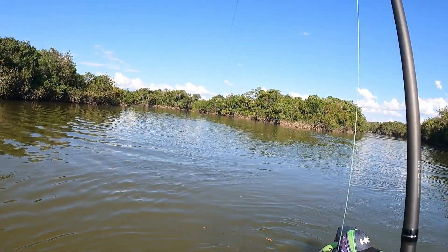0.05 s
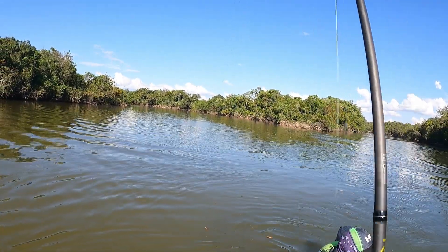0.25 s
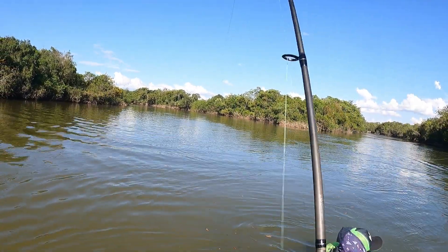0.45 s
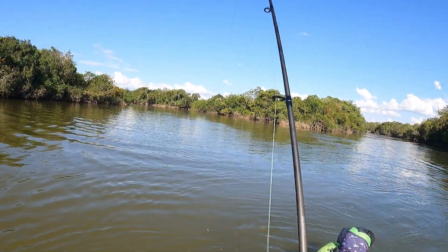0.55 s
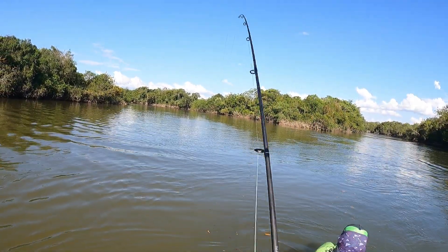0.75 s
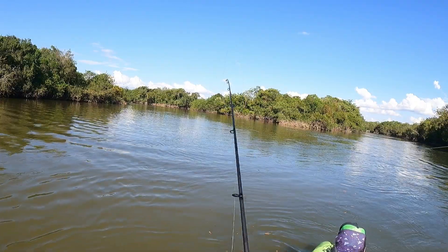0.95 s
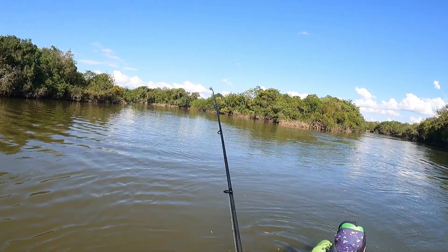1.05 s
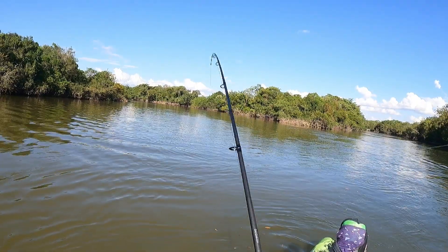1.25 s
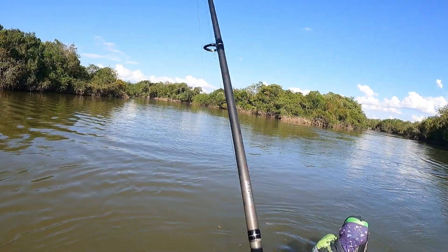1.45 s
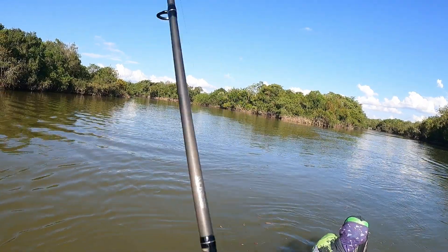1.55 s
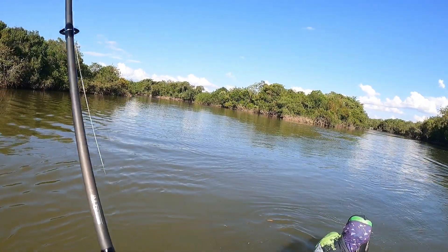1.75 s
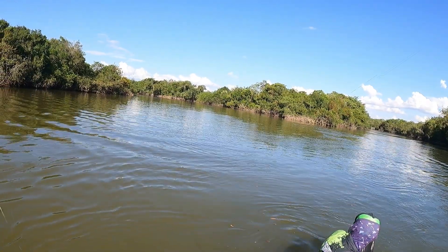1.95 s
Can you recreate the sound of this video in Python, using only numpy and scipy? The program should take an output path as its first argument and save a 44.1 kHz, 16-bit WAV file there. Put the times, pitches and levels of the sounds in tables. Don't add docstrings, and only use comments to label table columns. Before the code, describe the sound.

A fishing reel's drag buzzes in two quick bursts, then stops, leaving ticks and river hiss

```python
import sys
import numpy as np
from scipy import signal
from scipy.fft import rfft, irfft, next_fast_len
from scipy.io import wavfile
from scipy.ndimage import uniform_filter1d, map_coordinates

SR = 44100
rng = np.random.default_rng(int(sys.argv[2]) if len(sys.argv) > 2 else 0)


def unload_audio(sound):
    columns = np.transpose(np.atleast_2d(sound))
    steps = np.round(np.clip(columns, -1, 1) * 32767)
    wavfile.write(sys.argv[1], SR, steps.astype(np.int16))


def natural_amplitude(level_db):
    exponent = np.asarray(level_db, float) / 20
    return 10 ** exponent


N = 88200

# time in seconds, level in dB.
RIVER_LEVEL = [(0, -71), (.14, -60.5), (1.36, -55.5), (1.42, -62), (1.46, -62.5), (1.65, -61), (1.69, -64),
               (1.718, -67), (1.728, -59.5), (1.93, -58.5), (1.96, -61), (2, -63)]
# frequency in Hz, level in dB.
RIVER_SPECTRUM = [(600, -14.5), (1500, 1), (2300, -8), (4000, -11), (5400, -12.5), (6500, -14), (7600, -12),
                  (15400, -36.5)]
# frequency in Hz, level in dB.
HULL_SPECTRUM = [(100, -53), (135, -13), (170, -9), (230, -19), (400, -28.5), (900, -38)]
HULL_DB, HULL_SWELL_DB = -65.5, 2
# time in seconds, level in dB.
SLEEVE_LEVEL = [(0.0, -62.5), (0.24, -54.5), (0.39, -54.5), (0.49, -70.5), (0.63, -76), (0.82, -61),
                (1.0, -51.5), (1.23, -62), (1.38, -66), (1.59, -78.5), (2.0, -71.5)]
# frequency in Hz, level in dB.
CLOTH_SPECTRUM = [(120, -25), (200, 1), (350, 0.5), (600, -4.5), (1000, -12), (1500, -52)]
# time in seconds, level in dB.
WIND_LEVEL = [(0.0, -77), (0.27, -72), (0.31, -57.5), (0.56, -71), (0.7, -44), (0.87, -69), (0.9, -50),
              (1.01, -61), (1.13, -44.5), (1.33, -75), (1.37, -56.5), (1.77, -81), (1.97, -49), (2.0, -61)]
# frequency in Hz, level in dB.
WIND_SPECTRUM = [(10, -2), (28, -1.5), (45, -13.5), (62, -22), (90, -40), (130, -28)]

# time in seconds, tooth rate in Hz, pull in dB,
# extra load on the frame in dB, left-right balance set by the hand in dB.
SPOOL_MOTION = [(0, 399.5, -66, 10, 3), (.16, 511.7, -67, 13.5, 1), (.22, 700.2, -56, 1.5, -2),
                (.28, 948.6, -44.5, 1.5, -3), (.33, 1508, -39.5, -5, -4), (.4, 1701, -41.5, -1, -4),
                (.455, 2050, -44.5, -4, -4), (.56, 1926, -44.5, -4.5, -2), (.615, 1620, -44, -5.5, -1.5),
                (.66, 1953, -44, -7.5, -2), (.82, 1975, -49, -6, -1.5), (.88, 1730, -44.5, -2, -1),
                (1.01, 1396, -55, -2.5, -0.5), (1.1, 1441, -51, 0.5, .5), (1.165, 1534, -45.5, 4, 0),
                (1.19, 1197, -52, 2.5, -1), (1.32, 738.4, -53.5, 5.5, 0), (1.375, 620.7, -83.5, 22.5, 1)]
SURGE, SLIP, SLIP_RATE_HZ = .03, .12, 220
JITTER_TEETH, SCATTER_DB, SCRAPE_DB = 0.088, 3.5, -8.5
TURN_HZ, TURN_DEPTH = 106, .35
# frequency in Hz, width in Hz, level in dB.
FRAME_RINGS = [(1216, 350, -16), (1420, 120, -4.5), (1581, 247, 1.5), (1730, 150, -3.5), (1969, 48, -2),
               (2054, 110, -6.5)]
# frequency in Hz, level in dB.
FRAME_BODY = [(300, -47), (600, -27), (1000, -5), (1550, -4), (2000, -19), (2400, -14.5), (3200, -46)]
FRAME_DB, FRAME_FLUTTER_DB, FRAME_PAN = 18, -1, .4
# frequency in Hz, level in dB.
WHIRR_SPECTRUM = [(450, -51), (650, 5.5), (900, 0.5), (1300, -0.5), (2000, -35), (3000, -48)]
WHIRR_SMEAR_HZ = 300
# frequency in Hz, width in Hz, level in dB.
SPOOL_RINGS = [(2910, 260, -3), (3320, 260, -1), (4180, 170, 3.5), (5280, 480, -1), (6220, 300, -7),
               (6880, 420, -4), (8580, 600, -19), (10000, 700, -19)]
# frequency in Hz, level in dB.
SPOOL_BODY = [(1800, 14), (2400, 3), (3700, 1.5), (5500, 3.5), (7500, -3.5), (9200, -12), (12000, -17.5),
              (15000, -42)]
SPOOL_DB, WANDER_DB, DRIFT = 4.5, 3.5, .022
# frequency in Hz, side level in dB.
SIDE_SPECTRUM = [(2000, -6), (3500, -6), (6000, -28), (13000, -19), (16000, -3)]
PORT_LAG_S = 3.4e-5

# start in seconds, level in dB, centre frequency in Hz.
TICKS = [(.097, -41.5, 1800), (.398, -62, 10500), (.814, -61, 11980), (.912, -49.5, 9060),
         (1.038, -40, 4740), (1.055, -44, 2598), (1.055, -47, 6640), (1.092, -42.5, 6800),
         (.918, -46, 7000), (1.075, -52, 7000), (1.118, -53, 8500), (1.135, -48, 8500), (1.185, -50, 8954),
         (1.309, -59, 7915), (1.466, -43.5, 1640), (1.52, -51.5, 5900), (1.58, -54, 6300),
         (1.745, -47, 1730), (1.766, -48, 1590), (1.828, -37.5, 1660), (1.8285, -44, 4630),
         (1.949, -38, 4550), (1.9492, -51, 7400), (1.9495, -54, 1490), (1.98, -51, 4500),
         (1.997, -57, 3020)]
TICK_T60_S, TICK_BAND_RATIO = 0.011, 1.45
# start in seconds, frequency in Hz, level in dB, T60 in seconds.
KNOCKS = [(0.19, 252, -48.5, 0.054), (.34, 367, -47.5, 0.067), (.941, 141, -25.5, 0.057),
          (.942, 330, -36.5, 0.046), (.963, 387, -32, 0.032), (.972, 97, -24.5, 0.079),
          (.978, 720, -39.5, 0.027), (.985, 520, -33, 0.018), (1.1, 690, -45, 0.0094),
          (1.338, 247.7, -24.5, .045), (1.339, 432, -29, 0.02), (1.36, 225, -37.5, 0.041)]
KNOCK_RISE_CYCLES = 1.72
# start in seconds, length in seconds, frequency in Hz,
# level in dB.
LOCKS = [(.322, 0.054, 1444, -37), (.322, 0.021, 1776, -35), (.365, 0.03, 1923, -37),
         (.405, 0.034, 1367, -43), (.43, 0.047, 2032, -39.5), (.435, 0.036, 1727, -40.5),
         (.475, 0.038, 2020, -45), (.505, 0.028, 1980, -47.5), (.53, 0.04, 2050, -40.5),
         (.535, 0.05, 1780, -47), (.575, 0.037, 2020, -43.5), (.76, 0.034, 2150, -49),
         (.805, .035, 2000, -45), (.585, 0.059, 1558, -43), (.59, 0.034, 1707, -41.5),
         (.635, .035, 2080, -42.5), (.66, 0.024, 1682, -43.5), (.68, 0.044, 2118, -44.5),
         (.728, 0.036, 2050, -39), (.783, 0.019, 2030, -37), (.803, 0.026, 1627, -44),
         (.84, 0.022, 2020, -43), (.858, 0.042, 1710, -38.5), (.915, 0.047, 1606, -47),
         (1.175, 0.023, 1216, -41.5), (1.21, .03, 800, -54), (1.25, .03, 944, -50.5),
         (1.29, 0.045, 704.5, -52), (.425, .035, 5300, -57), (.48, 0.024, 5000, -44.5),
         (.49, 0.094, 4110, -53), (.6, 0.036, 3280, -46.5), (.33, 0.073, 3300, -48), (.69, .025, 4140, -44),
         (.725, .03, 6800, -57), (.855, .025, 4130, -46), (.9, 0.042, 5200, -53), (1.12, .04, 2990, -51.5),
         (1.138, 0.018, 6120, -51), (1.115, 0.051, 5250, -50.5)]
LOCK_WAVER, LOCK_EDGE, LOCK_ROUGH_DB = .008, .4, 2.5
BEAT_S, BEAT_LENGTH_S = 1.1025, .072
BEAT_HZ = (1450, 1556)
BEAT_DB = (-36, -33)
# start in seconds, length in seconds, first frequency in Hz,
# last frequency in Hz, level in dB.
DRIPS = [
    (1.51, .06, 4600, 4900, -75),
    (1.555, .016, 2350, 2400, -65),
    (1.6, .07, 3050, 3700, -73),
    (1.6, .06, 4800, 5350, -75),
    (1.722, .014, 2000, 2050, -63),
    (1.748, .038, 2850, 2870, -68),
    (1.845, .09, 2750, 3750, -72),
    (1.89, .05, 7300, 7600, -75),
    (1.958, .04, 1120, 1300, -60),
]
ROOM_DB, ROOM_T60_S = -16, .05


def unit(x):
    return x / np.sqrt(np.mean(x ** 2) + 1e-20)


def along(points, hz):
    f, db = np.transpose(points)
    return natural_amplitude(np.interp(np.log(hz + 1), np.log(f + 1), db, -120, -120))


def curves(rows):
    s, *columns = np.transpose(rows)
    return [np.interp(np.arange(N) / SR, s, column) for column in columns]


def wobble(rate):
    return map_coordinates(rng.standard_normal(N // 40), [np.arange(N) * rate / SR])


def filtered(x, response):
    m = next_fast_len(N + SR // 2)
    return irfft(rfft(x, m) * response(np.fft.rfftfreq(m, 1 / SR)), m)[..., :N]


def rings(table, body):
    def response(f):
        total = along(body, f)
        for centre, width, db in table:
            resonator = 1j * f * width / (centre ** 2 - f ** 2 + 1j * f * width)
            total = total + natural_amplitude(db) * resonator ** 2
        return total
    return response


def place(rows, shape):
    out, t = np.zeros(N + SR), np.arange(SR // 5) / SR
    for s, *row in rows:
        out[round(s * SR):][:len(t)] += shape(t, *row)
    return out[:N]


def rush(spectrum, side_db):
    mid, side = filtered(rng.standard_normal((2, N)), lambda hz: along(spectrum, hz))
    side = natural_amplitude(side_db) * side
    return unit(np.array([mid + side, mid - side]))


def river():
    level_db, = curves(RIVER_LEVEL)
    return natural_amplitude(level_db + 0.62 * wobble(25.3)) * rush(RIVER_SPECTRUM, side_db=-5.0)


def hull():
    return natural_amplitude(HULL_DB + HULL_SWELL_DB * wobble(11.13)) * rush(HULL_SPECTRUM, side_db=-2.5)


def sleeve():
    level_db, = curves(SLEEVE_LEVEL)
    return natural_amplitude(level_db + 2 + 2.4 * wobble(45)) * rush(CLOTH_SPECTRUM, side_db=-10)


def wind():
    level_db, = curves(WIND_LEVEL)
    return natural_amplitude(level_db) * rush(WIND_SPECTRUM, side_db=-6.5) * natural_amplitude([[-1.6], [1.6]])


def tooth_clicks(teeth):
    count = np.arange(1, int(teeth[-1]))
    jitter, scatter = rng.standard_normal((2, len(count)))
    at = np.interp(count + JITTER_TEETH * jitter, teeth, np.arange(N - 0.))
    low, part, size = at.astype(int), at % 1, natural_amplitude(SCATTER_DB * scatter)
    clicks = np.bincount(low, size * (1 - part), N + 1) + np.bincount(low + 1, size * part, N + 1)
    return unit(clicks[:N])


def frame_ring(force, load_db):
    t = np.arange(N) / SR
    turn = 1 + TURN_DEPTH * np.sin(2 * np.pi * TURN_HZ * t + 1.64 * wobble(7.4))
    load = natural_amplitude(load_db + FRAME_FLUTTER_DB * wobble(38.2))
    return natural_amplitude(FRAME_DB) * filtered(force * turn * load, rings(FRAME_RINGS, FRAME_BODY))


def whirr(teeth, level):
    tone = np.sin(2 * np.pi * teeth) * level * wobble(WHIRR_SMEAR_HZ)
    return filtered(tone, lambda f: along(WHIRR_SPECTRUM, f))


def drifting(x, hz, width, db):
    share = np.pi / 4 * (1 + np.tanh(wobble(9)))
    x = x * natural_amplitude(WANDER_DB * wobble(14.12))

    def ring(centre):
        return rings([(centre, width, db)], [(1, -99), (2, -99)])
    lower = filtered(x * np.cos(share), ring(hz * (1 - DRIFT / 2)))
    upper = filtered(x * np.sin(share), ring(hz * (1 + DRIFT / 2)))
    return lower + upper


def spool_ring(shaken):
    body = filtered(shaken * natural_amplitude(1.44 * wobble(20.88)), rings([], SPOOL_BODY))
    ringing = sum(drifting(shaken, *ring) for ring in SPOOL_RINGS)
    return natural_amplitude(SPOOL_DB) * (body + ringing)


def spool_side(scrape):
    tone = rings(SPOOL_RINGS, SPOOL_BODY)
    return natural_amplitude(SPOOL_DB + 2.5) * filtered(scrape, lambda f: tone(f) * along(SIDE_SPECTRUM, f))


def port_lag(f):
    return np.exp(1j * np.pi * f * PORT_LAG_S * np.array([[-1], [1]]))


def drag():
    rate_hz, pull_db, load_db, pan_db = curves(SPOOL_MOTION)
    teeth = np.cumsum(rate_hz * (1 + SURGE * wobble(25) + SLIP * wobble(SLIP_RATE_HZ))) / SR
    t, end = np.arange(N) / SR, SPOOL_MOTION[-1][0]
    running = t < end
    drive = tooth_clicks(teeth) * np.clip((end - t) / 0.017, 0, 1) * natural_amplitude(pull_db)
    scrape = natural_amplitude(SCRAPE_DB + pull_db) * running * rng.standard_normal((3, N))

    frame = frame_ring(drive + scrape[0], load_db)
    frame += whirr(teeth, natural_amplitude(pull_db + load_db) * running)
    frame += locked_spring()
    rattle = 0.2 * drive * rng.standard_normal(N)
    spool = spool_ring(rattle + 0.2 * drive + 2.3 * scrape[1])

    side_db = np.array([pan_db / 2, -pan_db / 2])
    direct = frame * natural_amplitude(FRAME_PAN * side_db) + spool * natural_amplitude(side_db)
    return filtered(direct, port_lag) + spool_side(scrape[2]) * [[1], [-1]]


def tick(t, db, hz):
    edge = np.clip(np.array([hz / TICK_BAND_RATIO, hz * TICK_BAND_RATIO]) / (SR / 2), .01, .9)
    burst = natural_amplitude(-60 * t / TICK_T60_S) * rng.standard_normal(len(t))
    burst = signal.sosfilt(signal.butter(3, edge, "band", output="sos"), burst)
    return natural_amplitude(db) * burst / abs(burst).max()


def knock(t, hz, db, t60):
    rise = (1 - np.exp(-t * hz / KNOCK_RISE_CYCLES)) ** 2
    return 3 * 1.28 * natural_amplitude(db - 60 * t / t60) * rise * np.sin(2 * np.pi * hz * t)


def lock(t, length, hz, db, rough=1):
    noise = rng.standard_normal((2, len(t)))
    waver, flutter = (rough * unit(uniform_filter1d(v, size=120)) for v in noise)
    shape = abs(np.sin(np.pi * np.clip(t / length, 0, 1))) ** LOCK_EDGE * (t < length)
    phase = 2 * np.pi * hz * np.cumsum(1 + LOCK_WAVER * waver) / SR
    return 1.61 * natural_amplitude(db + LOCK_ROUGH_DB * flutter) * shape * np.sin(phase)


def locked_spring():
    beat = [(BEAT_S, BEAT_LENGTH_S, hz, db, .1) for hz, db in zip(BEAT_HZ, BEAT_DB)]
    return place(LOCKS, lock) + place(beat, lock)


def drip(t, length, from_hz, to_hz, db):
    u = np.clip(t / length, 0, 1)
    waver = 1 + .012 * uniform_filter1d(rng.standard_normal(len(t)), size=150) * np.sqrt(150)
    phase = 2 * np.pi * np.cumsum((from_hz + (to_hz - from_hz) * u) * waver) / SR
    return natural_amplitude(db) * np.sqrt(2 * abs(np.sin(np.pi * u))) * np.sin(phase)


def boat(x):
    t = np.arange(SR // 8) / SR
    tail = rng.standard_normal((2, len(t))) * natural_amplitude(-60 * t / ROOM_T60_S)
    return signal.fftconvolve(x[None], tail / np.linalg.norm(tail[0]), axes=1)[:, :N]


def scene():
    background = river() + hull() + sleeve() + wind()
    reel = drag()
    small = place(TICKS, tick) + place(DRIPS, drip)
    reflections = natural_amplitude(ROOM_DB) * boat(reel.mean(0) + small)
    return background + reel + small + place(KNOCKS, knock) + reflections


def low_pass(x):
    return signal.sosfilt(signal.butter(12, 15600, fs=SR, output="sos"), x)


def record(dry):
    return low_pass(dry)


dry = scene()
out = record(dry)
unload_audio(out)
```